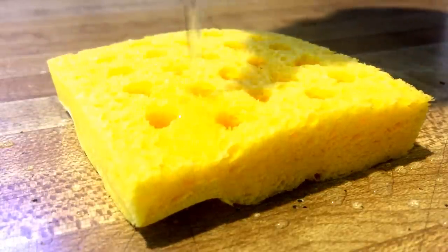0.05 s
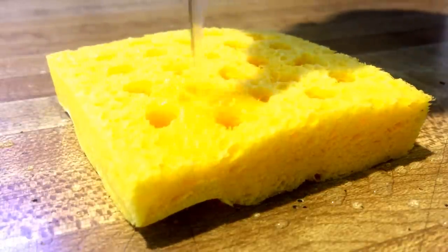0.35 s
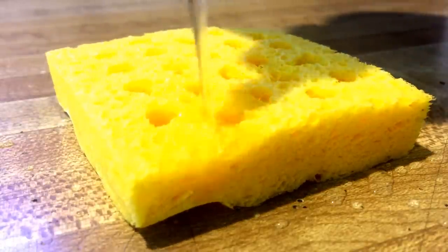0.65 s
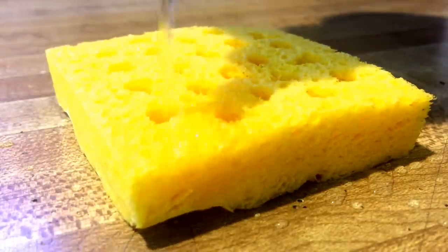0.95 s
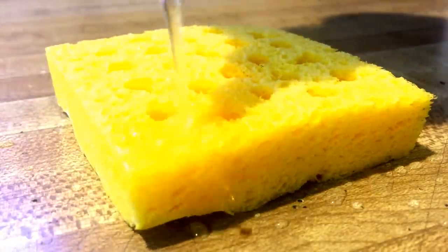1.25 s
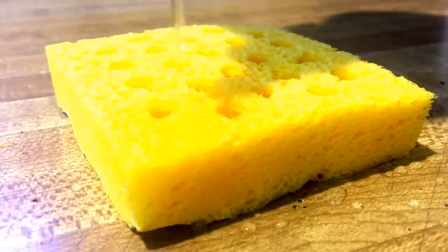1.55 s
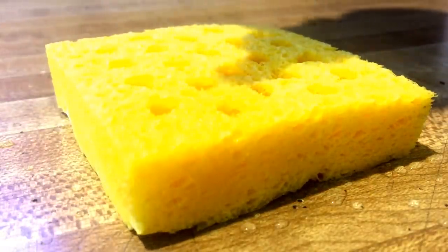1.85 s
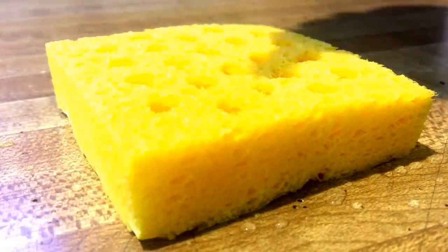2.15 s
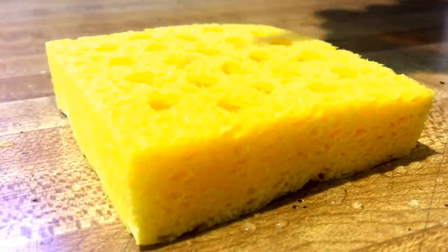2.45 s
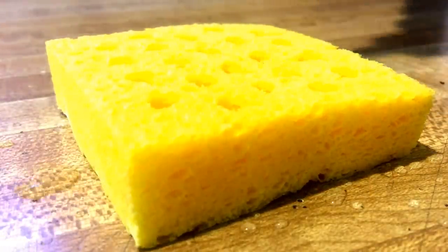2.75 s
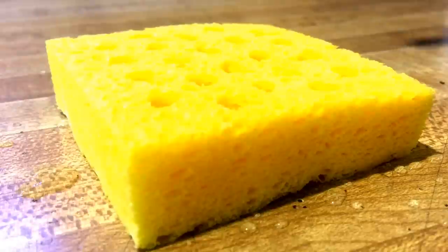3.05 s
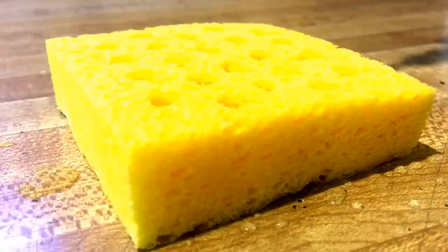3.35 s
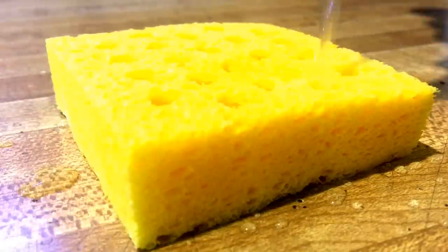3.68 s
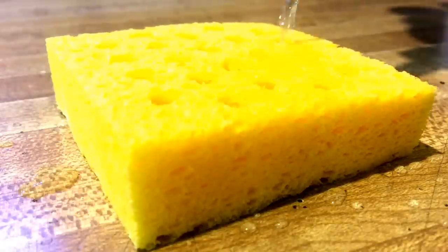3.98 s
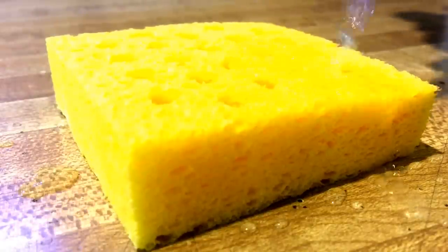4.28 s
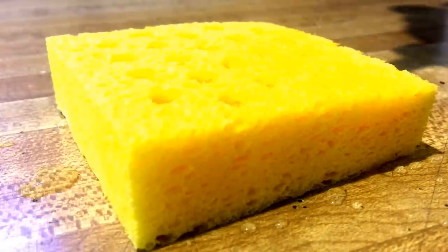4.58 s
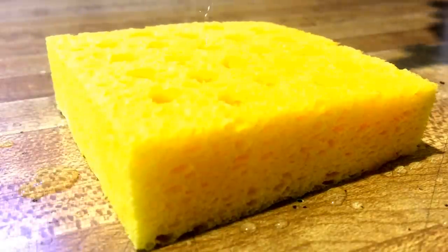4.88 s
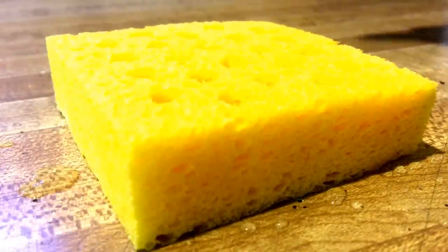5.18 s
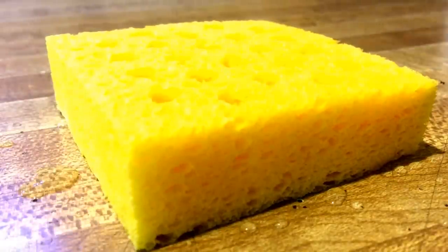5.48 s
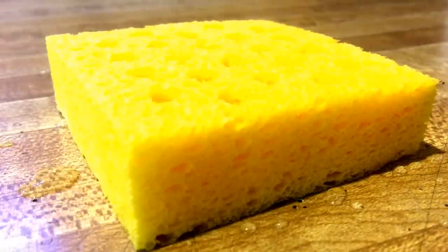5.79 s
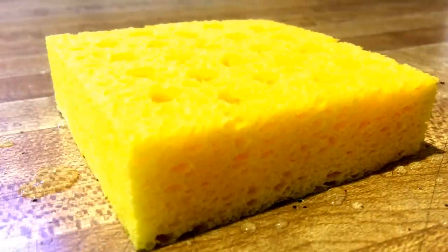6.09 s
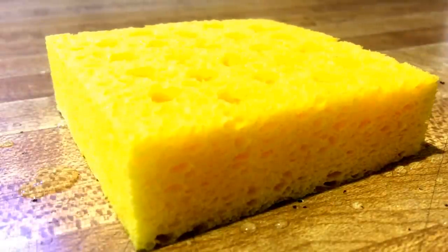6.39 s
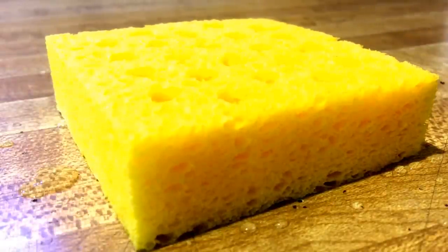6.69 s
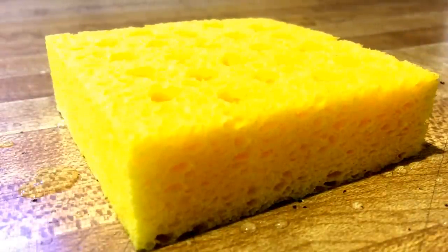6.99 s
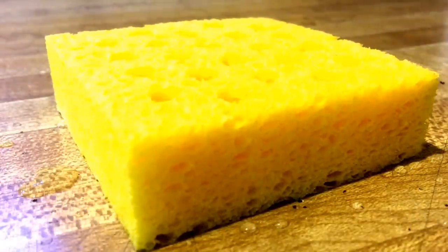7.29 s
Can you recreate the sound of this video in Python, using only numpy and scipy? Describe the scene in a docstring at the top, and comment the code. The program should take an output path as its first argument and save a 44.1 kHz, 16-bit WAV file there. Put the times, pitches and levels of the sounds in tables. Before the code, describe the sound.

Water is poured onto a dry sponge on a wooden board, heard close up in a quiet room. After a near-silent start, spilling water splatters on the wet wood with quick drips and bubbly plops. Something hard clinks lightly once, and the sponge fizzes faintly as it soaks. A second, shorter splatter follows, then a few tiny ticks over a faint steady hum.

```python
"""A quiet room, close to a dry sponge on a wooden board: a thin stream of water is poured on it twice.
The sponge drinks with a faint fizz and crackle from its pores. Where the water spills, drops slap the
wet wood, trapped air bubbles ring and pop, and splashes throw a fine spray. Something hard clinks
once between the pours. A faint mains hum and the air of the room lie underneath."""
import sys
import numpy as np
from scipy import signal
from scipy.fft import rfft, irfft, next_fast_len
from scipy.io import wavfile
from scipy.ndimage import uniform_filter1d, map_coordinates

SR = 44100
rng = np.random.default_rng(int(sys.argv[2]) if len(sys.argv) > 2 else 0)


def put_to_file(sound):
    """Save the sound as 16-bit audio at rate SR, in the file named by the first command-line argument."""
    columns = np.atleast_2d(sound).T  # one column per channel
    safe = np.clip(columns, -1, 1)
    whole_steps = np.round(safe * 32767)
    wavfile.write(sys.argv[1], SR, whole_steps.astype(np.int16))


N = 332301
TOP_HZ = 16000


def amp(db):
    """Decibels to gain."""
    return 10 ** (np.asarray(db) / 20)


def unit(x):
    """Scale to rms 1."""
    return x / np.sqrt(np.mean(x ** 2) + 1e-20)


def level(rows):
    """A fader curve through (time [s], level [dB]) points, silent outside them."""
    s, db = np.transpose(rows)
    t = np.arange(N) / SR
    return amp(np.interp(t, s, db)) * (t >= s[0]) * (t <= s[-1])


def wobble(rate):
    """A smooth random curve, rate knots a second."""
    knots = rng.standard_normal(int(N * rate / SR) + 4)
    return map_coordinates(knots, [np.arange(N) * rate / SR])


def filtered(x, response):
    """x through a gain that depends on frequency."""
    size = next_fast_len(N + SR // 2)
    return irfft(rfft(x, size) * response(np.fft.rfftfreq(size, 1 / SR)), size)[:N]


def equalise(x, curve):
    """x through an EQ of (frequency [Hz], gain [dB]) points, joined on a log axis."""
    points_hz, db = np.transpose(curve)
    return filtered(x, lambda hz: amp(np.interp(np.log(hz + 1), np.log(points_hz), db)))


def swell(turns, cycles):
    """The attack of a ring, building over its first cycles."""
    return 1 - np.exp(-(turns / cycles) ** 2)


def fade(t, t60):
    """Exponential decay, 60 dB down at t60."""
    return np.exp(-np.log(1000) * t / t60)


def scatter(times, sounds):
    """Mix each row of samples in at its start time."""
    index = np.round(np.abs(times) * SR).astype(int) + np.arange(sounds.shape[1])
    return np.bincount(index.ravel(), sounds.ravel(), N)[:N]


def bursts(rows, attack_s):
    """An envelope of (time [s], level [dB], t60 [s]) events that each rise and die away."""
    s, db, t60 = np.transpose(rows)[:, :, None]
    t = np.arange(SR // 4) / SR
    shape = (1 - np.exp(-t / attack_s)) * fade(t, t60)
    return scatter(s, amp(db) * shape / shape.max(axis=1, keepdims=True))


def grains(gain, rate, centre_hz, octaves, cycles, spread_db, size):
    """A random rain of tiny damped rings, each size samples long, whose rms follows gain."""
    draw = rng.random((int(rate * N / SR), 5))
    sounding = gain > 0
    audible = draw[sounding[(draw[:, 0] * N).astype(int)]]
    when, pitch_a, pitch_b, life, strength = audible.T[:, :, None]
    hz = np.minimum(centre_hz * 2 ** (octaves * (pitch_a - pitch_b)), TOP_HZ)
    turns = hz * np.arange(size) / SR
    rings = np.sin(2 * np.pi * turns) * swell(turns, .5) * fade(turns, cycles * (.5 + life))
    rain = scatter(when * N / SR, rings * amp(-spread_db * np.sqrt(strength)))
    return gain * rain / np.std(rain[sounding])


def plops(s, db, start_hz, end_hz, t60, glide_s, swell_cycles, cutoff_ratio):
    """Rings that swell, slide to their final pitch and die away; water muffles their top end."""
    t = np.arange(SR // 16) / SR
    turns = end_hz * t + (start_hz - end_hz) * glide_s * (1 - np.exp(-t / glide_s))
    rings = -np.sin(2 * np.pi * turns) * swell(turns, swell_cycles) * fade(t, t60)
    cutoffs_hz = np.minimum(cutoff_ratio * np.maximum(start_hz, end_hz).ravel(), TOP_HZ)
    muffled = np.array([signal.lfilter(*signal.butter(2, hz, fs=SR), ring)
                        for hz, ring in zip(cutoffs_hz, rings)])
    return scatter(s, amp(db) * muffled / np.abs(muffled).max(axis=1, keepdims=True))


def room_air():
    """Room tone: a steady bed of noise, weighted to the lows."""
    # spectrum of the air: (frequency [Hz], relative level [dB])
    air_colour = [(20, -26), (40, 1.5), (85, 4), (115, 2), (150, -10.5), (260, -7.5), (450, -13.5),
                  (800, -16.5), (2000, -19.5), (3200, -21.5), (9000, -26.5), (10500, -31.5), (12000, -27),
                  (16000, -34.5)]
    return amp(-68) * unit(equalise(rng.standard_normal(N), air_colour))


def mains_hum(mains_hz=60, waver_db=4):
    """A faint 60 Hz hum whose level drifts irregularly under steady overtones."""
    # level of the low hum: (time [s], level [dB])
    hum_level = [(0, -66.5), (.55, -74), (.95, -62), (1.6, -79.5), (2.05, -61), (2.65, -76), (3.15, -65.5),
                 (3.8, -69.5), (4.35, -78), (4.85, -66), (5.55, -68), (6.1, -79), (7.54, -69.5)]
    # overtones of the hum: (frequency [Hz], rms level [dB])
    overtones = [(240, -80.5), (360, -85.5), (480, -79.5), (600, -77.5), (720, -89), (840, -88.5),
                 (1080, -87.5), (1800, -96.5), (1920, -93)]
    t = np.arange(N) / SR

    def tone(hz):
        """A sine of rms 1 with a slight drift in phase."""
        return np.sqrt(2) * np.sin(2 * np.pi * (hz * t + rng.random()) + .2 * wobble(rate=3.7))

    low_hum = tone(mains_hz) * level(hum_level) * amp(waver_db * wobble(rate=10))
    return low_hum + sum(amp(db) * tone(hz) for hz, db in overtones)


def room_reverb(x, near_db=-11, near_t60=.04, tail_db=-20, tail_t60=.3, gap_s=.0024, hop=1024):
    """Nearby surfaces answer within milliseconds, then a faint tail follows."""
    # tone of the reflections: (frequency [Hz], gain [dB])
    room_colour = [(100, -7.5), (300, 4), (1000, -4), (2700, 3.5), (6000, -4.5), (15000, -1)]
    t = np.arange(SR // 5) / SR
    onset = 1 - np.exp(-(t / gap_s) ** 4)
    near = amp(near_db) * unit(fade(t, near_t60) * onset)
    tail = amp(tail_db) * unit(fade(t, tail_t60) * onset)
    decay = (near + tail) / np.sqrt(len(t))
    # each overlapping slice gets its own random pattern of reflections
    starts = np.arange(0, N - 2 * hop, hop)
    slices = x[starts[:, None] + np.arange(2 * hop)] * np.hanning(2 * hop)
    impulses = decay * rng.standard_normal((len(starts), len(t)))
    reflections = signal.fftconvolve(slices, impulses, axes=1)
    return equalise(scatter(starts[:, None] / SR, reflections), room_colour)


def clink(attack_s=.000086, halo_hz=2070, halo_width_hz=170, halo_db=-18, halo_t60=.28):
    """Something hard is lightly struck; its ring blurs into a short shimmering halo."""
    # the strike: (time [s], level [dB])
    strikes = [(3.3422, -27.5)]
    # modes of the struck object: (frequency [Hz], relative level [dB], t60 [s])
    modes = [(310, -14.5, 0.039), (930, -10, 0.011), (1820, -8.5, 0.029), (1955, -16.5, 0.13),
             (2190, -13, 0.07), (2320, -9.5, 0.027), (2980, -19, 0.056), (3680, -8.5, 0.014),
             (4420, -10.5, 0.019), (5650, -28, 0.1)]
    s, db = np.transpose(strikes)[:, :, None]
    t = np.arange(SR // 3) / SR
    ring = sum(amp(mode_db) * np.sin(2 * np.pi * (hz * t + rng.random())) * fade(t, t60)
               for hz, mode_db, t60 in modes)
    band = filtered(rng.standard_normal(N), lambda hz: 1 / (1 + ((hz - halo_hz) / halo_width_hz) ** 2))
    halo = amp(halo_db) * unit(band)[:len(t)] * fade(t, halo_t60)
    return scatter(s, amp(db) * (ring + halo) * (1 - np.exp(-t / attack_s)))


def sponge():
    """Pores fizz under the stream and gushes add a softer swish; a sparse crackle runs throughout."""
    # the second stream soaking into the pores: (time [s], level [dB])
    soak = [(3.45, -83.5), (3.88, -69), (4.05, -77), (4.5, -81.5)]
    # gushes in that stream: (time [s], level [dB], t60 [s])
    gushes = [(3.708, -64, 0.075), (3.858, -58.5, .19), (4.258, -70.5, 0.094)]
    # tone of the fizz: (frequency [Hz], gain [dB])
    fizz_colour = [(2500, -4.5), (4500, -0.5), (7000, 0.5), (10000, 3), (14000, 6.5)]
    gush = bursts(gushes, attack_s=.03)
    flow = level(soak) + gush
    fizz = grains(flow, rate=1900, centre_hz=8790, octaves=2.75, cycles=4.7, spread_db=33, size=128)
    swish = grains(gush, rate=5000, centre_hz=4240, octaves=1.87, cycles=7.3, spread_db=8.5, size=128)
    crackle = grains(np.ones(N), rate=23, centre_hz=11900, octaves=.653, cycles=6, spread_db=20, size=128)
    return amp(-2) * equalise(fizz, fizz_colour) + amp(-8.5) * swish + amp(-84) * crackle


def board_thud(hz=95.2, t60=.09):
    """The board gives one short, low boom under the heaviest gulp of water."""
    # the gulp landing: (time [s], level [dB])
    hits = [(2.083, -29.5)]
    s, db = np.transpose(hits)[:, :, None]
    t = np.arange(SR // 8) / SR
    boom = np.sin(2 * np.pi * hz * t) * swell(hz * t, cycles=.92) * fade(t, t60)
    return scatter(s, amp(db) * boom / np.abs(boom).max())


def spills():
    """Spilling water churns in low bubbles and splashes throw a fine spray; both spatter the board."""
    # how hard the water churns, one list per spill: (time [s], level [dB])
    churn_levels = [
        [(1.77, -62), (1.82, -46.5), (1.94, -44), (1.98, -57), (2.1, -46), (2.25, -57), (2.42, -69.5),
         (2.51, -49.5), (2.56, -60)],
        [(4.73, -42), (4.8, -48), (4.9, -69)],
    ]
    # splashes that throw spray: (time [s], level [dB], t60 [s])
    splashes = [(1.872, -49.5, 0.13), (1.899, -44.5, 0.036), (1.915, -40.5, 0.039), (1.934, -46, 0.088),
                (2.021, -52.5, 0.054), (2.029, -37, 0.033), (2.075, -52.5, 0.12), (2.101, -54.5, 0.21),
                (2.168, -44.5, 0.11), (2.203, -52, 0.029), (2.267, -48.5, 0.086), (2.468, -57, .12),
                (4.729, -46.5, .035), (4.824, -45, .04)]
    stir = sum(map(level, churn_levels))
    throw = bursts(splashes, attack_s=.00067)
    landing = amp(-23) * stir + amp(-12) * throw
    churn = grains(stir, rate=600, centre_hz=540, octaves=1.8, cycles=13, spread_db=9.5, size=1500)
    spatter = grains(landing, rate=1300, centre_hz=2910, octaves=1.4, cycles=55, spread_db=13.5, size=800)
    spray = grains(throw, rate=2200, centre_hz=7200, octaves=1.3, cycles=40, spread_db=12.5, size=400)
    return amp(-3) * churn + spatter + amp(-3.5) * spray


def droplet_ticks(roughness=.57, crack=.253, t60=.0038):
    """A droplet bursts in a very short, high ring with a shaky pitch and a little crack of noise."""
    # droplets and tiny bursting bubbles: (time [s], level [dB], pitch [Hz])
    droplets = [(.9674, -56.5, 9900), (1.7667, -27.5, 3960), (1.8641, -35.5, 3700), (1.8989, -22, 11960),
                (1.9166, -32.5, 4270), (1.9224, -26, 4270), (1.9354, -27, 12050), (1.9478, -33.5, 10800),
                (1.957, -42, 4630), (2.0296, -26.5, 11500), (2.0353, -27, 6220), (2.0537, -33.5, 6800),
                (2.1038, -30.5, 4330), (2.168, -29, 5270), (2.1813, -31.5, 10000), (2.2041, -36.5, 6440),
                (2.2707, -29, 12500), (2.3287, -39, 11900), (2.4019, -43.5, 3420), (2.4626, -41.5, 6050),
                (2.4769, -36.5, 11460), (2.4947, -32, 12350), (2.6127, -44.5, 3900), (3.1362, -43.5, 10900),
                (3.343, -35, 3800), (3.4693, -42, 13700), (3.548, -56, 5600), (3.5873, -47, 4260),
                (3.7167, -40, 10710), (3.873, -48, 11480), (3.9071, -42, 9500), (4.1734, -50.5, 9570),
                (4.2626, -48, 9170), (4.268, -52, 7670), (4.5965, -39, 9600), (4.73, -28, 3850),
                (4.7303, -32.5, 6470), (4.884, -43, 7060), (4.9903, -44, 9890), (5.509, -46.5, 13040),
                (5.913, -41, 13350), (6.555, -42, 5000), (6.6066, -47, 11700), (6.69, -37, 7010),
                (6.8917, -45.5, 11900), (7.0854, -46, 8090)]
    s, db, hz = np.transpose(droplets)[:, :, None]
    t = np.arange(SR // 64) / SR
    shake, snap = rng.standard_normal((2, len(s), len(t)))
    phase_drift = roughness * np.cumsum(uniform_filter1d(shake, size=5, axis=1), axis=1) / 2
    ring = np.sin(2 * np.pi * hz * t + phase_drift)
    tick = (ring + crack * snap) * swell(hz * t, cycles=1.64) * fade(t, t60)
    return scatter(s, amp(db) * tick / np.abs(tick).max(axis=1, keepdims=True))


def drop_slaps(sag=.93, decay_cycles=3.3):
    """A drop lands with a dull knock of a few cycles whose pitch sags a little."""
    # drops hitting the wet board: (time [s], level [dB], starting pitch [Hz])
    drops = [(1.7507, -24, 1000), (1.767, -16.5, 1020), (1.8646, -16.5, 820), (1.8989, -17, 680),
             (4.7141, -25, 1700), (4.7306, -15.5, 1120), (4.7875, -24, 850), (4.9845, -32.5, 910)]
    s, db, hz = np.transpose(drops)[:, :, None]
    return plops(s, db, hz, sag * hz, decay_cycles / hz, glide_s=.002, swell_cycles=.46, cutoff_ratio=1.7)


def bubbles(glide_share=.13, octave_rise_hz=521):
    """Trapped air rings as a bubble, chirping up early in its life as it nears the surface."""
    # the larger air bubbles: (time [s], level [dB], final pitch [Hz], t60 [s])
    pops = [(1.378, -58.5, 1190, 0.01), (1.751, -17.5, 2880, 0.0076), (1.7812, -12, 1260, 0.0064),
            (1.8079, -25.5, 1000, 0.01), (1.82, -38, 380, 0.035), (1.8403, -23.5, 1080, 0.02),
            (1.8927, -23, 620, 0.014), (1.9197, -23, 397, 0.0083), (1.936, -22.5, 560, 0.0064),
            (1.9483, -36, 1240, 0.019), (1.957, -41, 2085, 0.016), (2.0228, -37.5, 1900, .015),
            (2.0305, -27, 1133, 0.021), (2.0373, -23.5, 1001, .01), (2.074, -32, 640, 0.046),
            (2.0848, -11, 1058, 0.02), (2.1, -25, 700, 0.014), (2.1008, -24, 1330, 0.015),
            (2.1254, -30, 450, .025), (2.137, -44, 3140, 0.0052), (2.1489, -29.5, 1350, 0.0079),
            (2.2053, -20.5, 1100, 0.015), (2.235, -33, 1170, 0.013), (2.237, -38, 340, 0.027),
            (2.2716, -30, 676, 0.011), (2.272, -48.5, 2430, 0.034), (2.2951, -28.5, 333, 0.027),
            (2.2976, -15.5, 1274, .01), (2.3989, -37.5, 1280, .017), (2.421, -38, 1165, 0.0074),
            (2.4636, -26, 755, 0.043), (2.475, -36, 1200, 0.011), (2.4956, -31.5, 412, 0.0334),
            (2.51, -35, 353, .04), (2.5233, -37.5, 940, 0.031), (3.4688, -45.5, 600, 0.016),
            (4.7152, -31, 3000, 0.01), (4.7534, -19, 1160, 0.0095), (4.826, -32.5, 630, 0.028),
            (4.8263, -31.5, 1770, 0.016), (4.8836, -46, 676, 0.033), (4.9839, -32, 2110, 0.027),
            (5.006, -35.5, 1297, 0.0091), (6.3038, -58, 1400, .02), (6.309, -47.5, 1970, 0.0069),
            (6.311, -60, 860, 0.027)]
    s, db, hz, t60 = np.transpose(pops)[:, :, None]
    start_hz = hz / (1 + octave_rise_hz / hz)  # higher bubbles climb a smaller interval
    return plops(s, db, start_hz, hz, t60, glide_s=glide_share * t60, swell_cycles=.58, cutoff_ratio=1.45)


def scene(low_cut_hz=130):
    """The mono mix: water, clink and sponge with their reverb, over hum and room tone."""
    # tone of the water just above the board: (frequency [Hz], gain [dB])
    board_colour = [(150, -7.5), (300, 1), (1000, 1), (3900, 1), (4900, -7), (5800, 1.5), (12000, 0),
                    (15000, -1.5)]
    on_board = drop_slaps() + bubbles() + board_thud() + droplet_ticks() + clink() + spills()
    close = equalise(on_board, board_colour) + sponge()
    # such small sources radiate little bass
    close = signal.sosfilt(signal.butter(2, low_cut_hz, "high", fs=SR, output="sos"), close)
    return (close + room_reverb(close) + mains_hum() + room_air())[None]


def record(dry):
    """A steep high cut at TOP_HZ on the whole mix."""
    return filtered(dry[0], lambda hz: 1 / (1 + (hz / TOP_HZ) ** 120))[None]


dry = scene()
out = record(dry)
put_to_file(out)
```